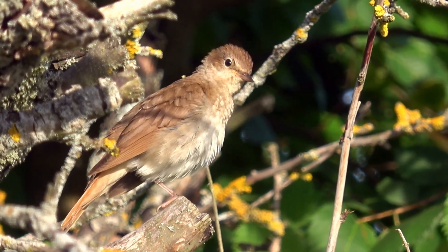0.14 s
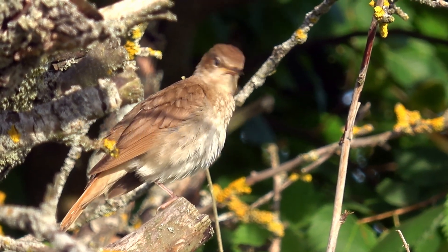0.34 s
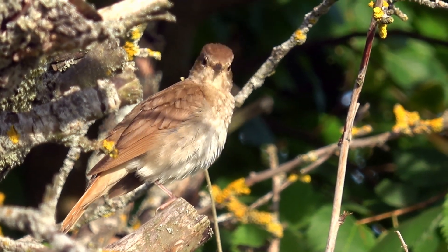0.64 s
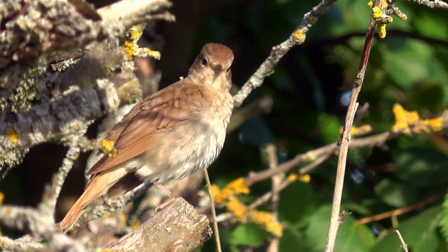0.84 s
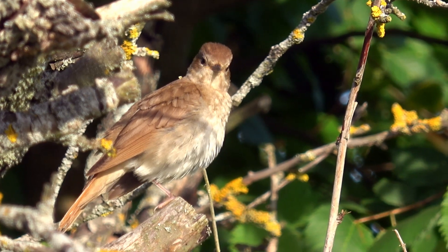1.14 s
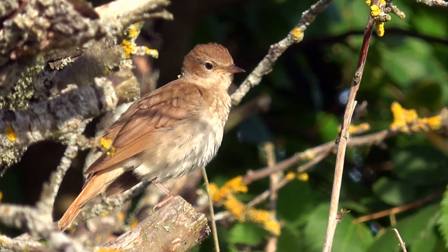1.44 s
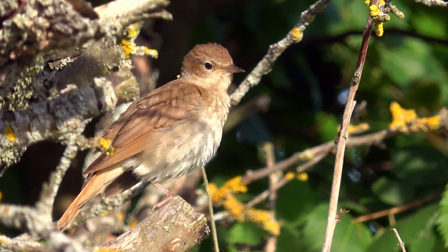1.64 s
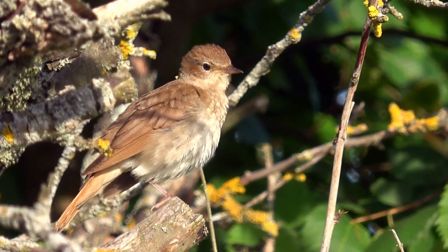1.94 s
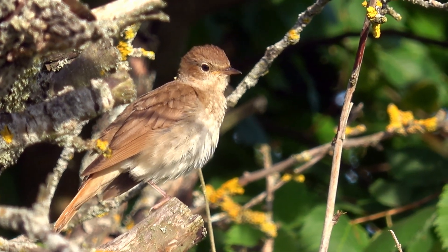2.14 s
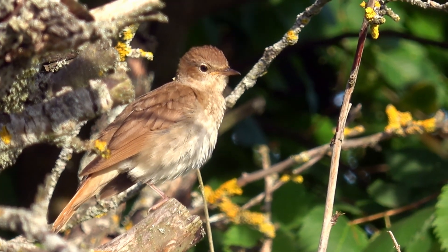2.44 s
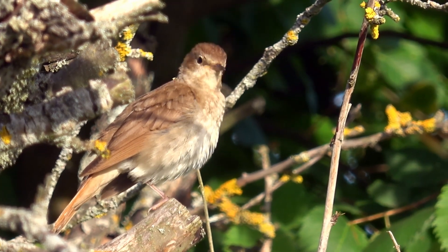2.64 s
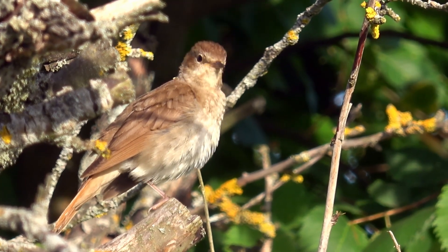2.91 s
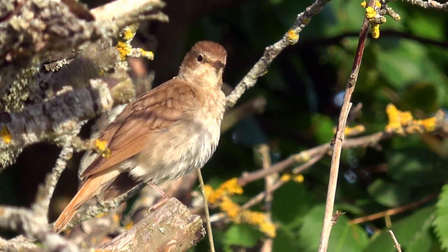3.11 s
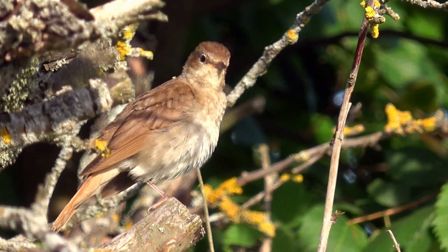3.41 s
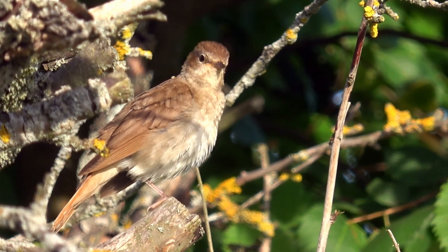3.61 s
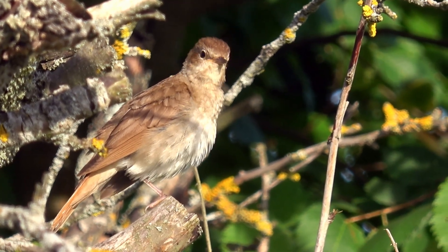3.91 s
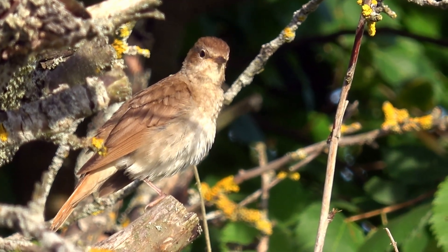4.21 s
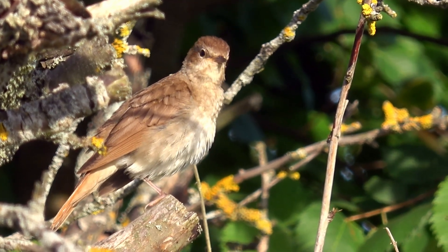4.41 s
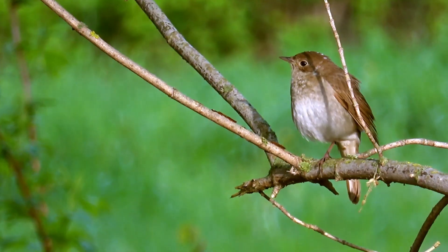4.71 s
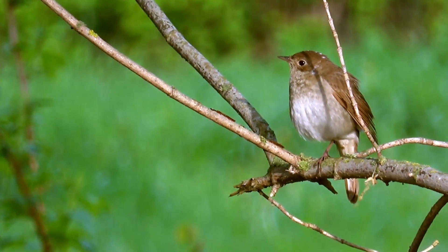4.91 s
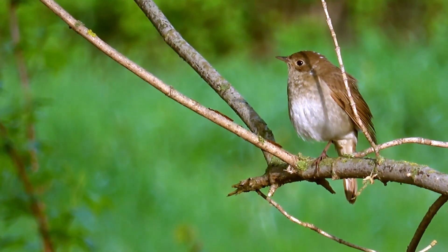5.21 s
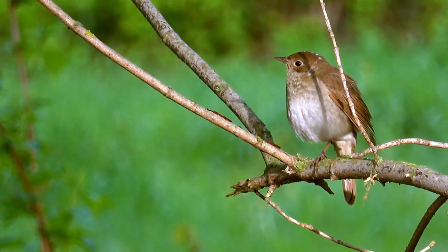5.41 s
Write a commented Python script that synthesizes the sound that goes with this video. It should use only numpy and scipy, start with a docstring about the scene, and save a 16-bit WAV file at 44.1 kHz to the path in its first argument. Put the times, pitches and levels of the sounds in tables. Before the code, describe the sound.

Outdoors among leaves, a nightingale near the microphone slides down two clear whistles, hoots softly four times and adds sharp chips and clicks, building to a rapid rattle with a whistled flourish. The foliage adds a slight echo, and faint twittering and hiss lie behind. The air then shifts to an open field, where a bird farther away makes hoarse chucks and three short, high whistles.

```python
"""Nightingale in a thicket

A nightingale sings from a branch. Its syrinx gives sliding whistles, low hoots, soft two-voiced notes
and a fast rattle; slapping membranes, filtered by throat and beak, give harsh chips and dry clicks.
The thicket scatters the song, and other birds twitter far off over a faint hiss. Near the end the
thicket gives way to an open meadow, where a more distant bird whistles three times."""
import sys
import numpy as np
from scipy import signal
from scipy.fft import rfft, irfft, next_fast_len
from scipy.io import wavfile
from scipy.ndimage import uniform_filter1d

SR = 44100
rng = np.random.default_rng(int(sys.argv[2]) if len(sys.argv) > 2 else 0)


def int16_out(signal):
    """Quantize to a 16-bit WAV file."""
    q = np.round(np.clip(np.atleast_2d(signal).T, -1, 1) * 32767)
    wavfile.write(sys.argv[1], SR, q.astype(np.int16))


N = 244755
BAND_LIMIT_HZ = 15900


def amp(db):
    """Decibels as an amplitude ratio."""
    return 10 ** (np.asarray(db) / 20)


def unit(x):
    """Normalisation to rms 1."""
    return x / np.sqrt(np.mean(x ** 2) + 1e-20)


def read(points, hz):
    """Linear interpolation on a log-frequency axis."""
    f, value = np.transpose(points)
    return np.interp(np.log(hz + 1), np.log(f + 1), value)


def add(mix, s, sound):
    """Superposition: a sound joins the mix at s seconds."""
    start = round(s * SR)
    sound = sound[max(-start, 0):]
    part = mix[max(start, 0):][:len(sound)]
    part += sound[:len(part)]


def colour(x, points):
    """Zero-phase filtering by a curve of (Hz, dB) points."""
    size = next_fast_len(len(x) + 512, True)
    gain = amp(read(points, np.fft.rfftfreq(size, 1 / SR)))
    return irfft(rfft(x, size) * gain, size)[:len(x)]


def progress(length):
    """Normalised time, 0 to 1, over a length in seconds."""
    return np.linspace(0, 1, max(int(length * SR), 16))


def waver(size, hz):
    """Low-pass noise of rms 1, up to about hz."""
    span = max(int(SR / hz / 2), 1)
    smooth = uniform_filter1d(uniform_filter1d(rng.standard_normal(size), span), span)
    return smooth * np.sqrt(span * 3 / 2)


def phase_of(hz):
    """Phase is the integral of frequency."""
    return 2 * np.pi * np.cumsum(hz) / SR


def arch(u, start, middle, end):
    """A parabola through three pitches."""
    return np.polyval(np.polyfit([0, .5, 1], [start, middle, end], 2), u)


def swell(u, power):
    """A half-sine envelope, flatter at low powers."""
    return np.abs(np.sin(np.pi * u)) ** power


def series(start_s, gap_s, slowing_s, count):
    """Onset times whose gaps grow in arithmetic progression."""
    k = np.arange(count)
    return start_s + gap_s * k + slowing_s * k * (k - 1) / 2


def place(x, balance):
    """Interaural level difference sets a sound left or right, band by band."""
    ears = zip(np.broadcast_to(x, (2, N)), (1, -1))
    return np.array([colour(ear, [(hz, sign * db / 2) for hz, db in balance]) for ear, sign in ears])


def glide(hz, jitter=.016):
    """Slight random frequency modulation makes a thin, unsteady tone."""
    phase = phase_of(hz * (1 + jitter * waver(len(hz), 250)))
    return np.sin(phase) * swell(np.linspace(0, 1, len(hz)), .24)


def whistle(hz, db, second_db=-33, third_db=-33, jitter=.003):
    """A nearly sinusoidal oscillation has only faint harmonics."""
    smooth_hz = uniform_filter1d(hz, size=180, mode="nearest")
    phase = phase_of(smooth_hz * (1 + jitter * waver(len(hz), 400)))
    tone = np.sin(phase) + amp(second_db) * np.sin(2 * phase) + amp(third_db) * np.sin(3 * phase)
    return tone * amp(db) * signal.windows.tukey(len(hz), .06)


def low_note(length, hz, start, end, rough):
    """Random modulation roughens three harmonics; start and end are pitch ratios to hz."""
    u = progress(length)
    phase = phase_of(hz * arch(u ** 1.22, start, .99, end) * (1 + .2 * rough * waver(len(u), 900)))
    overtones = amp(-11) * np.sin(2 * phase) + amp(-25) * np.sin(3 * phase)
    tone = np.sin(phase) * swell(u, 1.12) + amp(-10 * rough) * overtones * swell(u, .27)
    return tone * (1 + (.13 + .23 * rough) * waver(len(u), 190))


def noise_bursts(rows, spectrum):
    """Filtered noise has no period, so its notes sound hoarse."""
    out = np.zeros(N)
    for s, length, db in rows:
        u = progress(length)
        add(out, s, amp(db) * unit(colour(rng.standard_normal(len(u)), spectrum)) * swell(u, .54))
    return out


def air(spectrum, coherence, patchy_db):
    """Partly coherent noise at the two ears, its spectrum drifting in slight patches."""
    frames, hz = N // 512 + 5, np.fft.rfftfreq(2048, 1 / SR)
    a, b, c, d, patches = rng.standard_normal((5, frames, len(hz)))
    patches = unit(uniform_filter1d(uniform_filter1d(patches, size=10, axis=0), size=20, axis=1))
    same = read(coherence, hz)
    left = a + 1j * b
    right = same * left + np.sqrt(1 - same ** 2) * (c + 1j * d)
    spectra = np.array([left, right]) * amp(read(spectrum, hz) + patchy_db * patches)
    return unit(signal.istft(spectra.swapaxes(1, 2), nperseg=2048, noverlap=1536)[1][:, :N])


# Spectra of the air. Each row: frequency in Hz, relative density in dB.
THICKET_HISS = [(240, -26), (400, -9), (683, -3), (900, -5), (942, -8.5), (1240, -8), (1510, -9),
                (1690, -16.5), (2790, -11.5), (3410, -14.5), (3740, -10), (4770, -17), (15500, -29.5)]
THICKET_RUMBLE = [(12, -37), (20, -4.5), (49, 4), (81, -8), (107, -7), (146, -13), (262, -14.5),
                  (375, -9.5), (420, -16.5), (550, -52), (920, -120)]
MEADOW_HISS = [(18, -59), (30, -32), (47, -23), (69, 4), (102, -5), (192, -16.5), (532, -4), (808, -3),
               (1110, -2), (2360, -11.5), (3320, -6), (4540, -12), (5590, -14), (8280, -30), (15500, -37.5)]
# Likeness of the two ears. Each row: frequency in Hz, coherence from 0 to 1.
THICKET_COHERENCE = [(60, 1), (180, 0.58), (550, 0.8), (1650, 0.88), (4970, 0.62), (15000, 0.28)]
MEADOW_COHERENCE = [(60, 1), (240, 0.9), (950, 1), (3770, 0.72), (15000, 0.24)]

def ambient_noise():
    """Steady broadband noise: hiss and rumble for the thicket, a louder hiss for the meadow."""
    hiss = amp(-54.5) * air(THICKET_HISS, THICKET_COHERENCE, patchy_db=1.6)
    rumble = amp(-60) * air(THICKET_RUMBLE, THICKET_COHERENCE, patchy_db=0)
    return hiss + rumble, amp(-44) * air(MEADOW_HISS, MEADOW_COHERENCE, patchy_db=1.55)


# An earlier whistle's echo. Each row: start in seconds, length in seconds, level in dB.
ECHO = [(-0.12, .2, -46.5)]
# Its band. Each row: frequency in Hz, gain in dB.
ECHO_BAND = [(4400, -30), (4620, -3), (4850, -11), (6300, -21), (7000, -45)]

def dying_echo():
    """The reverberation of a whistle is narrow-band noise."""
    return noise_bursts(ECHO, ECHO_BAND)


def chatter(span_s, hz_range, length_range_s, db, count, bend=.2514, spread_db=6):
    """A random process: short bent notes, uniform in time, pitch and level."""
    out = np.zeros(N)
    for when, long, high, loud, first, last in rng.random(size=(count, 6)):
        u = progress(np.interp(long, [0, 1], length_range_s))
        contour = arch(u, 1 + bend * (first - .5), 1, 1 + bend * (last - .5))
        note = glide(np.interp(high, [0, 1], hz_range) * contour, jitter=.0354)
        add(out, np.interp(when, [0, 1], span_s), amp(db + spread_db * (loud - .5)) * note)
    return out


# Clear far notes. Each row: start and length in seconds, level in dB, first, middle and last pitch in Hz.
TWITTER = [(0.274, 0.059, -56, 3170, 3310, 3220), (0.667, 0.031, -50, 3070, 3330, 3490),
           (.805, .13, -61, 3370, 3290, 3270), (1.835, 0.084, -58, 4480, 4950, 5020),
           (2.956, 0.035, -50.5, 7900, 6320, 8060), (4.182, .088, -60.5, 4350, 4150, 3730),
           (4.33, 0.063, -54, 3630, 3150, 2830), (4.5, 0.047, -51.5, 3940, 3840, 3800),
           (4.559, 0.09, -56, 3250, 3360, 3430), (5.183, .08, -46.5, 3370, 3370, 3400),
           (5.217, .022, -47.5, 5800, 5280, 5850), (5.492, .012, -42, 3350, 3470, 4600)]

def twitter():
    """Frequency glides of far birds: a few clear ones over faint chatter."""
    out = chatter((0, N / SR), (3196, 4290), (.0403, .14), db=-60, count=30)
    # a small bird answers with a burst of tiny high notes
    out += chatter((2.62, 3.05), (5200, 7400), (.01198, .0254), db=-55.5, count=9, bend=.4)
    for s, length, db, start, middle, end in TWITTER:
        add(out, s, amp(db) * glide(arch(progress(length), start, middle, end), jitter=.018))
    return out


# Partials of a mewing call. Each row: harmonic number, relative level in dB.
MEW_PARTIALS = [(1, -3), (2, -0.5), (3, -10.5), (4, -14)]

def mew(start_s=2.17, length_s=.24, hz=804, level_db=-54):
    """A harmonic series on a slightly arched fundamental makes one far mewing call."""
    out = np.zeros(N)
    u = progress(length_s)
    phase = phase_of(hz * arch(u, .88, .99, .88) * (1 + .012 * waver(len(u), 200)))
    tone = sum(amp(level_db + db) * np.sin(k * phase) for k, db in MEW_PARTIALS)
    add(out, start_s, tone * swell(u, .18))
    return out


# Syllables. Each row: time of the top in seconds, top and final pitch in Hz, level in dB.
WARBLES = [(5.311, 6300, 5640, -46.5), (5.395, 5970, 5000, -47), (5.477, 6060, 4750, -45),
           (5.553, 6200, 4800, -50)]

def warbler(up_s=.014, down_s=.023):
    """Frequency modulation by a far warbler: a soft flick up, then a slide that levels out."""
    out = np.zeros(N)
    t = np.arange(-up_s, down_s, 1 / SR)
    up, down = np.maximum(-t / up_s, 0), np.maximum(t / down_s, 0)
    for s, top_hz, low_hz, db in WARBLES:
        hz = top_hz * (1 - .26 * up ** 2) + (low_hz - top_hz) * np.sin(np.pi / 2 * down)
        add(out, s - up_s, amp(db - 6 * up) * glide(hz))
    return out


# Meadow chucks. Each row: start in seconds, level in dB.
CHUCKS = [(4.325, -54.5), (4.391, -51.5), (4.472, -49.5), (4.545, -49), (4.625, -51), (4.975, -36),
          (5.005, -36.5)]
# Their spectrum. Each row: frequency in Hz, gain in dB.
CHUCK_SPECTRUM = [(700, -28), (1400, -3.5), (2100, 6.5), (3000, -3), (4700, 1), (7000, -13.5), (8300, -19),
                  (9600, -17.5), (13000, -32), (16000, -42)]

def chucks(length_s=.027):
    """Noise with a formant near 2 kHz makes hoarse chucks."""
    return noise_bursts([(s, length_s, db) for s, db in CHUCKS], CHUCK_SPECTRUM)


SCOOP_S = .0089  # a whistle starts flat and settles with this time constant
# Meadow whistles. Each row: start and length in seconds, top pitch in Hz, level in dB.
DROOPS = [(4.715, .05, 7990, -41), (4.82, 0.051, 7810, -38), (4.945, 0.053, 7225, -31)]

def droops(end_hz=5660):
    """Power-law sweeps: high whistles swell as they fall ever faster."""
    out = np.zeros(N)
    for s, length, top_hz, db in DROOPS:
        u = progress(length)
        scoop = 1 - .04 * np.exp(-u * length / SCOOP_S)
        hz = (top_hz + (end_hz - top_hz) * u ** 3.1) * scoop
        level = db + np.interp(u, [0, .68, 1], [-14, 0, -.5])
        add(out, s, whistle(hz, level, second_db=-36, third_db=-60, jitter=.006))
    return out


def scatter(x, near_t60, far_t60, far_db, same):
    """Multiple scattering: a quick burst from leaves, a longer faint tail from trees further off."""
    t = np.arange(SR) / SR
    mid, side = rng.standard_normal((2, SR)) * (rng.random((2, SR)) < .15)
    # treble differs most between the ears
    side = colour(side, [(3000, -13), (6000, 2.5), (9000, 6), (13000, 10)])
    response = np.sqrt(1 + same) * mid + np.sqrt(1 - same) * np.array([side, -side])
    decay = amp(-60 * t / near_t60) + amp(far_db - 60 * t / far_t60)
    response *= decay * (1 - np.exp(-t / .001))
    incident = colour(x, [(1200, -1.5), (2600, -2), (3800, 5), (4800, 2.5), (5800, 1.5),
                          (6600, 2), (9000, 2), (14000, .5)])
    return signal.fftconvolve(incident[None], response / np.linalg.norm(response[0]), axes=1)[:, :N]


# Echoes from the nearest branches and the ground. Each row: delay in seconds, gain in dB.
REFLECTIONS = [(.0023, -16.5), (.0052, -12.5), (.0083, -12.5), (.0135, -22.5)]

def early_reflections(x):
    """Interference: delayed copies beat against a sliding whistle."""
    out = np.zeros((2, N))
    for k, (delay, db) in enumerate(REFLECTIONS):
        add(out[k % 2], delay, amp(db) * x)
        add(out[1 - k % 2], delay, amp(db - 3) * x)
    return out


# Lone rasps. Each row: start and length in seconds, level in dB.
RASPS = [(.505, 0.023, -44), (.745, 0.017, -44.5), (.995, .034, -53), (1.06, 0.033, -50.5),
         (2.075, 0.018, -54), (2.117, 0.013, -52), (2.166, 0.024, -56)]
# The spectrum of a rasp. Each row: frequency in Hz, gain in dB.
RASP_SPECTRUM = [(1200, -37), (2200, -7), (3200, 3), (4300, -3), (5400, 2.5), (6800, -9.5), (8200, -13.5),
                 (9500, -25), (12500, -23), (16000, -36)]

def rasps():
    """Noise with two formants makes the nightingale's soft rasps."""
    return noise_bursts(RASPS, RASP_SPECTRUM)


def croak(pulse_s=.014, hz=1200, db=-45):
    """Temporal fusion: overlapping low pulses are heard as one croak."""
    out = np.zeros(N)
    for s in series(start_s=3.115, gap_s=.0112, slowing_s=0, count=6):
        add(out, s, amp(db) * low_note(pulse_s, hz, start=1.08, end=.87, rough=.53))
    return out


# Tuts. Each row: start in seconds, level in dB, middle pitch in Hz.
TUTS = [(0.173, -37.5, 2110), (.564, -35, 2200), (3.11, -42, 1540)]

def tuts(length_s=.00825, fall=.267):
    """A falling tone only a dozen or so cycles long is heard as a tut."""
    out = np.zeros(N)
    for s, db, hz in TUTS:
        add(out, s, amp(db) * low_note(length_s, hz, 1 + fall, 1 - fall, rough=.41))
    return out


def pips(length_s=.022, hz=2770, first_db=-41, step_db=-1):
    """A train of tone bursts slows and fades under the flourish."""
    out = np.zeros(N)
    for k, s in enumerate(series(start_s=3.865, gap_s=.0413, slowing_s=.0043, count=5)):
        add(out, s, amp(first_db + k * step_db) * low_note(length_s, hz, start=.89, end=.95, rough=.41))
    return out


# Hoots. Each row: start in seconds, level in dB, top pitch in Hz, roughness from 0 to 1.
HOOTS = [(.984, -40.5, 1336, 0.25), (1.243, -39, 1266, 0.44), (1.507, -40, 1214, 0.35),
         (1.757, -41, 1156, 0.19)]

def hoots(length_s=.056, grace_s=.023, lead_s=.04):
    """Low harmonic tones arch in pitch, each led in by a brief, higher grace note."""
    out = np.zeros(N)
    for s, db, hz, rough in HOOTS:
        add(out, s - lead_s, amp(db - 8.5) * low_note(grace_s, hz * 1.41, start=.78, end=.83, rough=.4))
        add(out, s, amp(db) * low_note(length_s, hz, start=.73, end=.73, rough=rough))
    return out


# Two-voiced notes. Each row: start and length in seconds, level in dB, lower and upper pitch in Hz.
DUETS = [(0.101, 0.047, -45.5, 3100, 4010), (0.413, 0.041, -45, 3103, 4170),
         (1.629, 0.049, -44, 2987, 4180), (2.033, 0.035, -43, 2976, 4190), (2.57, 0.031, -44, 3040, 4144),
         (3.089, 0.039, -45.5, 3135, 4200), (3.842, 0.04, -44.5, 2990, 4160)]

def duets(jitter=.019, sag=.12, rasp_lead_s=.016, rasp_s=.022):
    """Nonlinear mixing of the syrinx's two sides gives sum tones; each note sags and ends in a rasp."""
    out = np.zeros(N)
    for s, length, db, low_hz, high_hz in DUETS:
        u = progress(length)
        bend = 1 - sag * u ** 8
        low, high = (np.sin(phase_of(hz * bend * (1 + jitter * waver(len(u), 600))))
                     for hz in (low_hz, high_hz))
        pair = low + high * swell(u, .94)
        mixed = pair + .31 * pair ** 2 + .054 * pair ** 3
        voice = colour(mixed, [(1000, -28), (2600, -5), (6000, 3.5), (9000, -4)])
        add(out, s, amp(db) * voice * swell(u ** 1.55, .44))
    endings = [(s + length - rasp_lead_s, rasp_s, db - 1) for s, length, db, _, _ in DUETS]
    return out + noise_bursts(endings, RASP_SPECTRUM)


# Resonances of throat and beak. Each row: frequency in Hz, gain in dB.
VOCAL_TRACT = [(700, -48), (1500, -28.5), (2500, -9), (3400, -9), (4400, -10), (5200, -2.5), (5900, 0),
               (6500, -10.5), (7500, -16.5), (9000, -19), (12300, -17.5), (15500, -34)]

def membrane_pulses(length, start_hz, end_hz, rough, taper, smear=.35):
    """Source and filter: membranes slap in slowing, uneven pulses; throat and beak colour and smear."""
    u = progress(length)
    pitch = start_hz * (end_hz / start_hz) ** u * (1 + .026 * waver(len(u), 1500))
    phase = phase_of(pitch)
    pulses = sum(np.cos(k * phase + smear * k ** 2) * (k * pitch < BAND_LIMIT_HZ) for k in range(1, 24))
    drive = unit(pulses) + rough * rng.standard_normal(len(u))
    return unit(colour(drive, VOCAL_TRACT)) * signal.windows.tukey(len(u), taper)


# Click pairs. Each row: start in seconds, gap in seconds, level in dB.
CLICKS = [(2.703, .0312, -31), (2.9052, 0.03, -31.5), (3.2997, 0.0063, -34), (3.371, .0064, -33),
          (3.439, 0.0064, -32)]

def clicks(length_s=.006, fade_db=-11):
    """Damped transients: a few milliseconds of pulses, dying from the first slap."""
    out = np.zeros(N)
    for s, gap, db in CLICKS:
        for at in (s, s + gap):
            click = membrane_pulses(length_s, 1492, 811, rough=.84, taper=.17)
            add(out, at, amp(db + fade_db * progress(length_s)) * click)
    return out


# Course of the rattle. Each row: time in seconds, tone level in dB, top pitch in Hz,
# snap level in dB, upper voice in Hz.
RATTLE_COURSE = [(3.476, -39.5, 3270, -29.5, 5630), (3.53, -31, 3576, -29, 4940),
                 (3.61, -28, 3880, -33.5, 4800), (3.74, -28, 3907, -30.5, 4530),
                 (3.794, -32, 3734, -36, 4430)]

def rattle(rise_s=.007, fall_s=.00312, end_hz=2000, snap_s=.008, trail_s=.0076, trail_db=-39):
    """A train of chirps: each swells and rises, collapses with a snap and trails a faint upper voice."""
    out = np.zeros(N)
    t = np.arange(-rise_s, fall_s, 1 / SR)
    when, *course = np.transpose(RATTLE_COURSE)
    for s in series(start_s=3.476, gap_s=.0256, slowing_s=.00016, count=13):
        db, hz, snap_db, upper_hz = (np.interp(s, when, column) for column in course)
        pitch = np.interp(t, [-rise_s, -rise_s / 10, 0, fall_s], [.8 * hz, hz, hz, end_hz])
        phase = phase_of(pitch * (1 + .048 * waver(len(t), 900)))
        tone = np.sin(phase) + amp(-21) * np.sin(2 * phase) + amp(-22) * np.sin(3 * phase)
        envelope = amp(db + np.interp(t, [-rise_s, -rise_s / 10, fall_s], [-17, 1.5, -7]))
        add(out, s - rise_s, envelope * signal.windows.tukey(len(t), .15) * tone)
        snap = membrane_pulses(snap_s, 1400, 802, rough=.77, taper=.31)
        add(out, s - .0005, amp(snap_db - 14 * progress(snap_s)) * snap)
        trail = glide(upper_hz * (1 - .055 * progress(trail_s)), jitter=.027)
        add(out, s + .005, amp(trail_db) * trail)
    return out


# Harsh chips. Each row: start in seconds, level in dB, length in seconds.
CHIPS = [(1.9203, -27.5, .017), (2.4962, -28, .019)]

def chips(start_hz=1600, end_hz=650, upper_db=-10):
    """Steep down-sweeps, loudest at the throat's resonances; a higher voice slides down with them."""
    out = np.zeros(N)
    formants = [(1500, 9.5), (2700, -2), (4200, -2), (5900, 4), (7500, 8.5), (10000, -2.5), (14000, -5)]
    for s, db, length in CHIPS:
        u = progress(length)
        sweep = colour(membrane_pulses(length, start_hz, end_hz, rough=.73, taper=.19), formants)
        upper_hz = arch(u, 7050, 6000, 5370) * (1 + .072 * waver(len(u), 1200))
        voices = unit(sweep) + amp(upper_db) * unit(np.sin(phase_of(upper_hz)))
        add(out, s, amp(db) * unit(voices * swell(u, .36)))
    return out


# The whistle that ends the phrase. Each row: time in seconds, pitch in Hz, level in dB.
FLOURISH = [(3.906, 4360, -47), (3.913, 5830, -21.5), (3.920, 6660, -31), (3.927, 7000, -38),
            (3.936, 6720, -28), (3.9525, 6120, -28), (3.955, 5980, -15.5), (3.963, 5500, -27.5),
            (3.972, 5400, -32)]

def flourish():
    """Joint frequency and amplitude modulation: a whistle arches up and is loudest on the way down."""
    out = np.zeros(N)
    s, hz, db = np.transpose(FLOURISH)
    t = np.arange(s[0], s[-1], 1 / SR)
    add(out, s[0], whistle(np.interp(t, s, hz), np.interp(t, s, db), second_db=-28))
    return out


# Slurred whistles. Each row: time of mid-slide in seconds, high and low pitch in Hz, level in dB,
# hold in seconds, accent on the low note in dB.
SLURS = [(.303, 6546, 4676, -20, 0.038, -2.5), (.698, 6690, 4845, -22.5, .032, 10)]

def slurs(lead_s=.039, half_slide_s=.0093, accent_at_s=.025, accent_width_s=.0051):
    """Glissando: a whistle swells on its high note, slides down in an S, holds and lets go."""
    out = np.zeros(N)
    rise_db_per_s, sag_db_per_s, release_db_per_s = 1050, 110, 1600
    for s, high_hz, low_hz, db, hold, accent_db in SLURS:
        t = np.arange(-lead_s, hold + .023, 1 / SR)
        slide_hz = low_hz + (high_hz - low_hz) * (1 - np.tanh(t / half_slide_s)) / 2
        scoop = 1 - .068 * np.exp((t[0] - t) / SCOOP_S)
        since_full = t + .0047  # full voice comes just before mid-slide
        rise_and_sag = np.minimum(rise_db_per_s * since_full, -sag_db_per_s * since_full)
        release = -release_db_per_s * np.maximum(t - hold, 0)
        accent = accent_db * np.exp(-((t - accent_at_s) / accent_width_s) ** 2)
        add(out, s + t[0], whistle(slide_hz * scoop, db + rise_and_sag + release + accent))
    return out


# Stereo balances. Each row: frequency in Hz, left minus right in dB.
SINGER_BALANCE = [(1200, 1.5), (3700, 0.5), (4800, 2.6), (5900, -1.5), (9500, 3.5), (12500, -1)]
THICKET_BALANCE = [(60, 0.5), (240, 2), (950, 2.0), (3770, 0), (15000, 0.5)]
MEADOW_BALANCE = [(60, 3.0), (180, -0.5), (550, -2), (1650, -2), (4970, -5.5), (15000, 2.5)]
# The crossfade. Each row: time in seconds, share of the meadow from 0 to 1.
MEADOW_SHARE = [(4.05, 0.05), (4.3, 0.35), (4.6, 0.48), (5.0, 1), (5.5, 0.79)]

def scene():
    """Direct and scattered sound superpose; the background crossfades from thicket to meadow."""
    song = (slurs() + flourish() + chips() + clicks() + rattle() + duets()
            + hoots() + pips() + tuts() + croak() + rasps())
    scattered = amp(-4) * scatter(song, near_t60=.09, far_t60=.34, far_db=-6.5, same=.76)
    singer = place(song + early_reflections(song) + scattered, SINGER_BALANCE)
    far = twitter() + warbler() + mew() + dying_echo()
    far = far + amp(-5.5) * scatter(far, near_t60=.15, far_t60=.66, far_db=-14, same=.48)
    calls = droops() + chucks()
    calls = calls + amp(-2) * scatter(calls, near_t60=.37, far_t60=.56, far_db=-15, same=.8)
    thicket_air, meadow_air = ambient_noise()
    share = np.interp(np.arange(N) / SR, *np.transpose(MEADOW_SHARE))
    thicket = place((1 - share) * (thicket_air + far), THICKET_BALANCE)
    meadow = place(share * (meadow_air + far) + calls, MEADOW_BALANCE)
    return singer + thicket + meadow


def record(dry):
    """Band limiting: the microphone loses the deepest bass, and a steep low-pass cuts the top treble."""
    thin = signal.sosfilt(signal.butter(2, 30, "highpass", fs=SR, output="sos"), dry)
    lowpass = signal.firwin(511, BAND_LIMIT_HZ, window=("kaiser", 9), fs=SR)
    return signal.oaconvolve(thin, lowpass[None], "same", axes=1)


dry = scene()
out = record(dry)
int16_out(out)
```